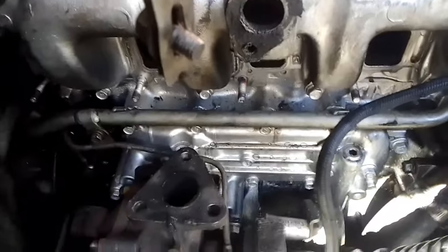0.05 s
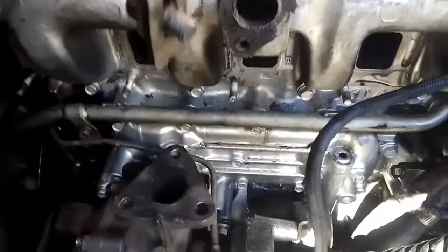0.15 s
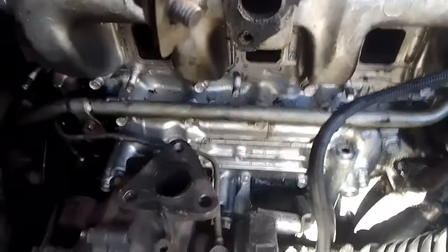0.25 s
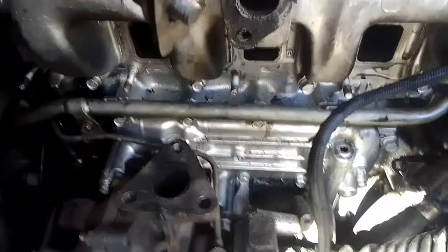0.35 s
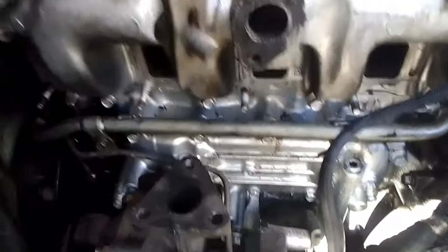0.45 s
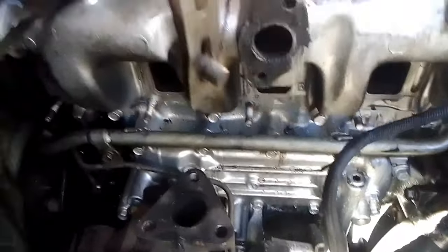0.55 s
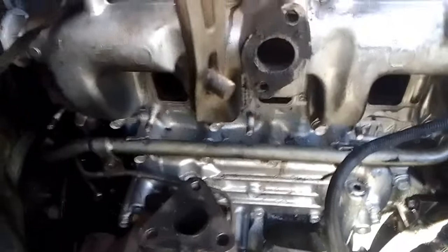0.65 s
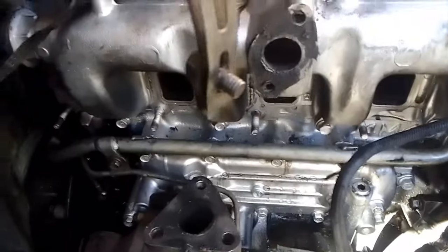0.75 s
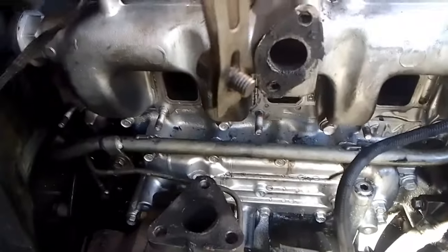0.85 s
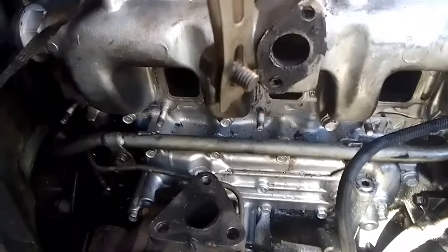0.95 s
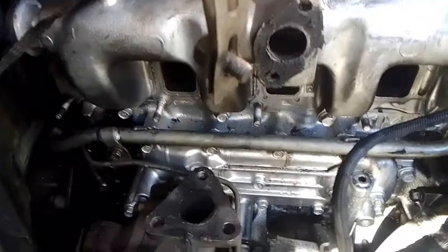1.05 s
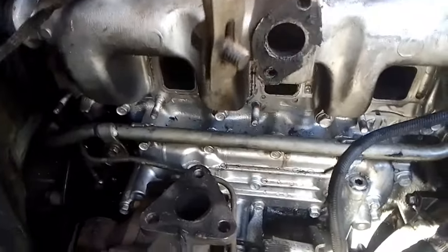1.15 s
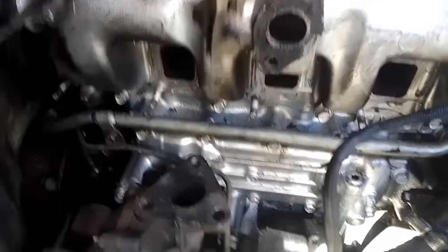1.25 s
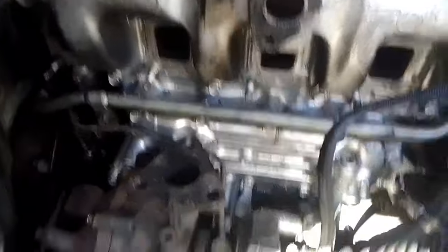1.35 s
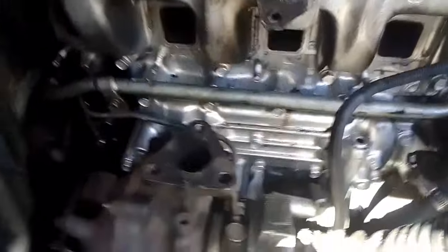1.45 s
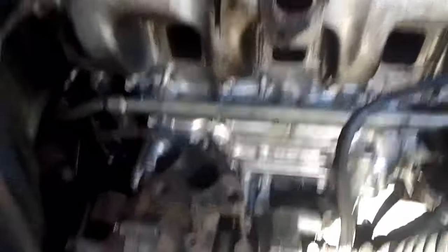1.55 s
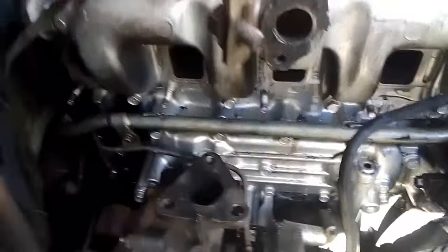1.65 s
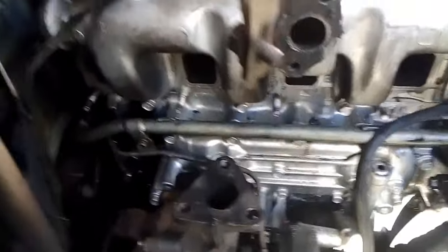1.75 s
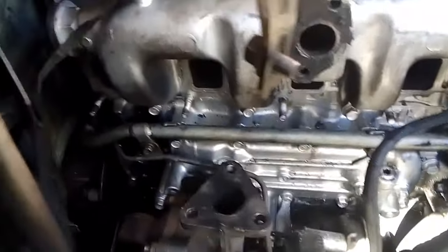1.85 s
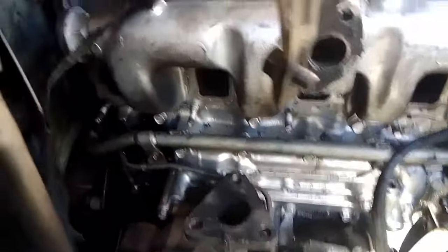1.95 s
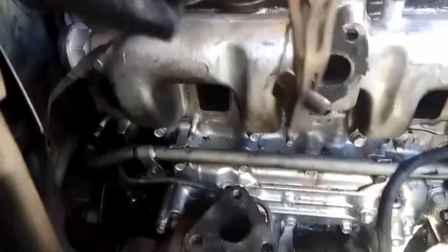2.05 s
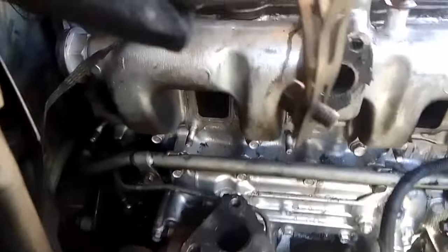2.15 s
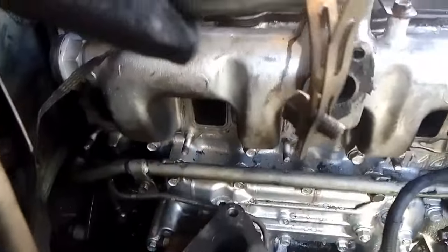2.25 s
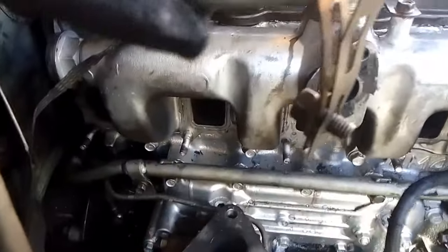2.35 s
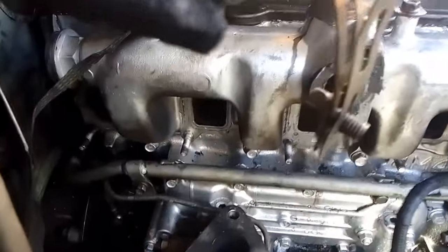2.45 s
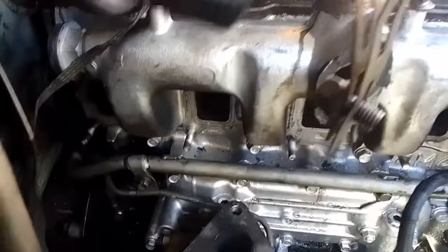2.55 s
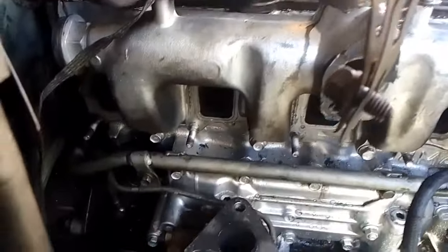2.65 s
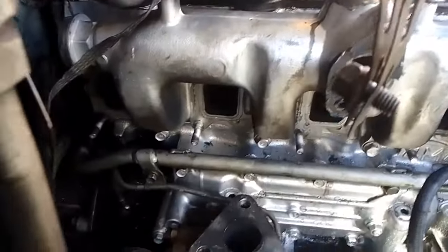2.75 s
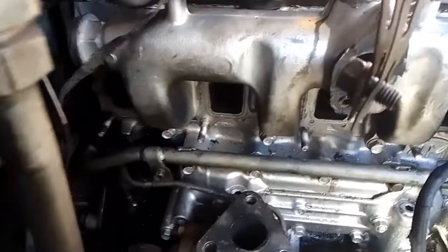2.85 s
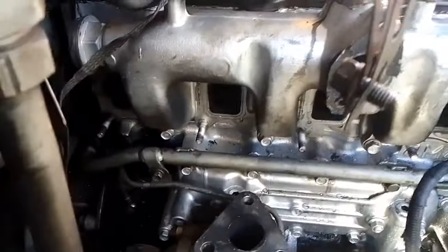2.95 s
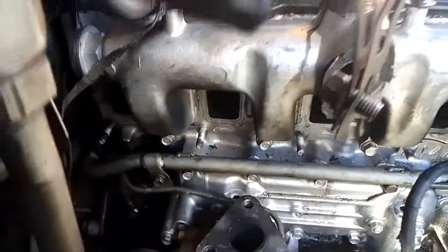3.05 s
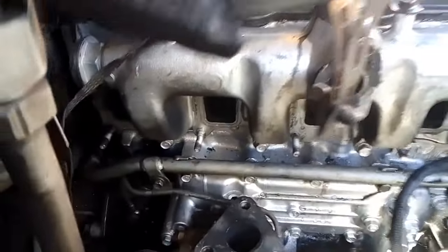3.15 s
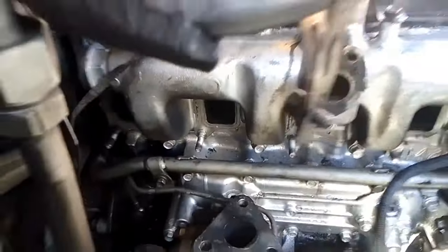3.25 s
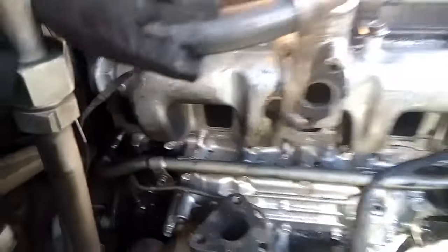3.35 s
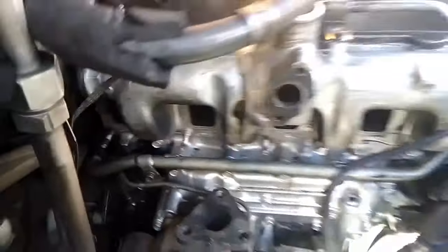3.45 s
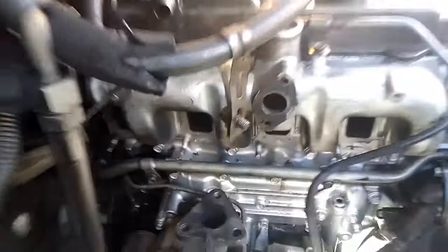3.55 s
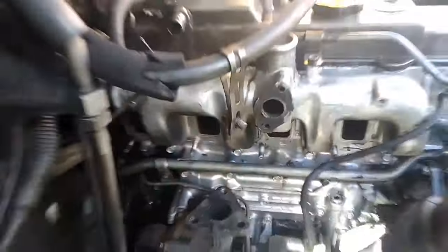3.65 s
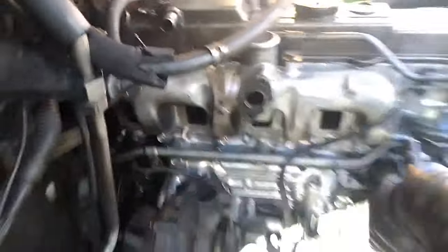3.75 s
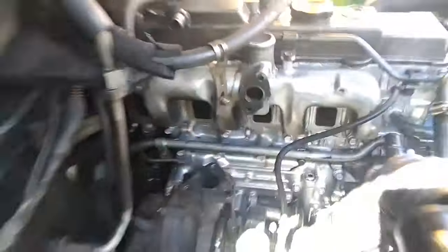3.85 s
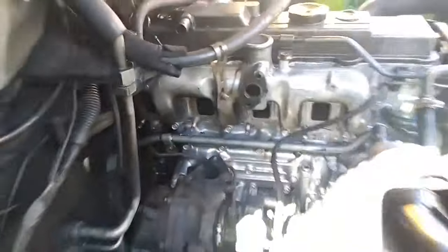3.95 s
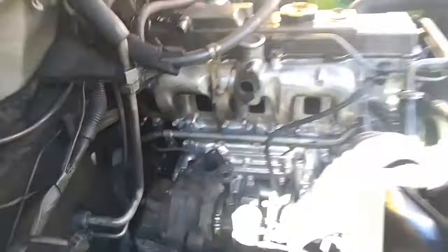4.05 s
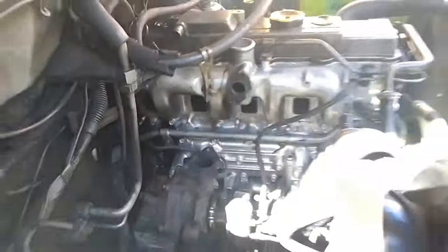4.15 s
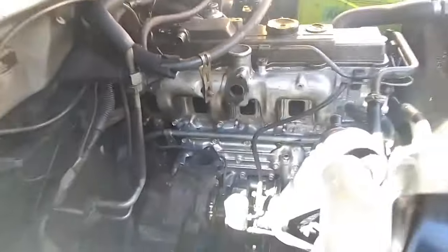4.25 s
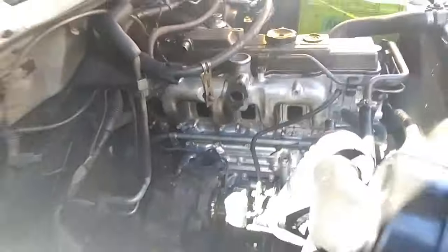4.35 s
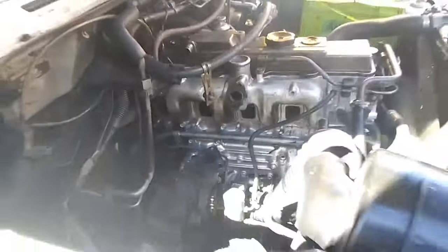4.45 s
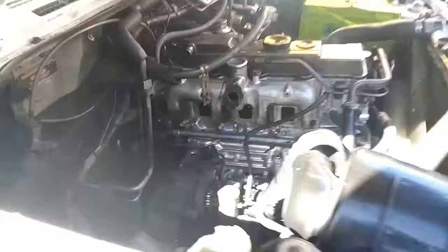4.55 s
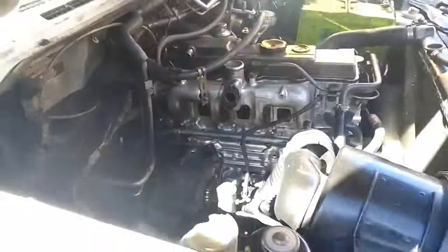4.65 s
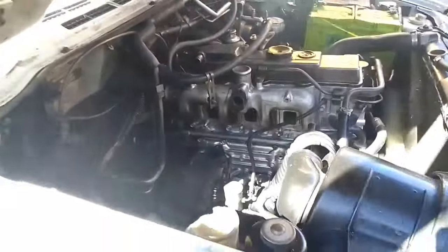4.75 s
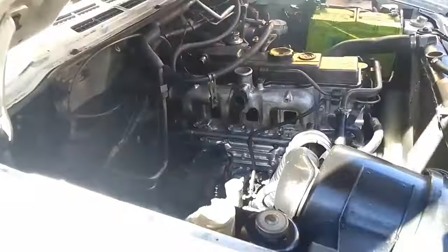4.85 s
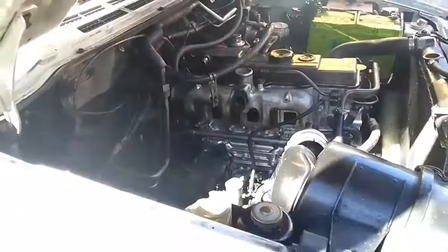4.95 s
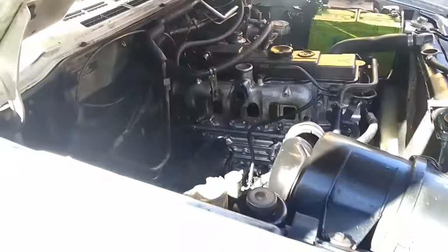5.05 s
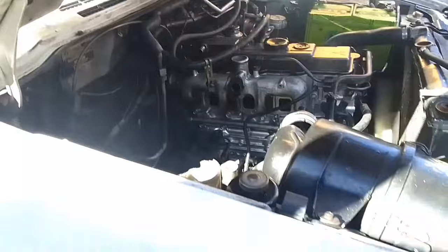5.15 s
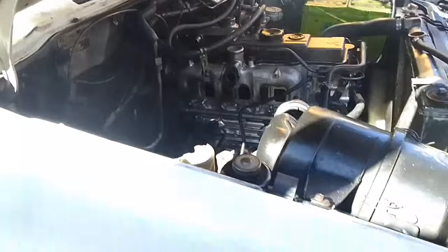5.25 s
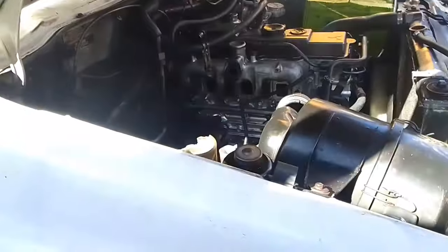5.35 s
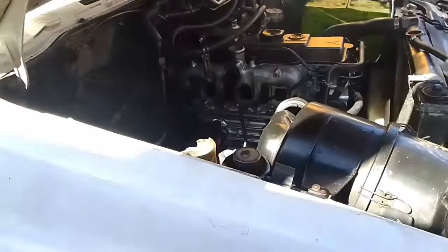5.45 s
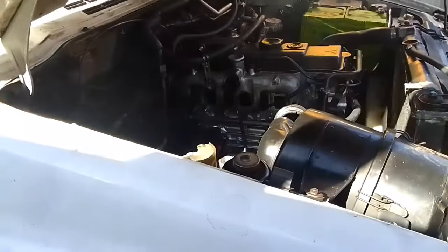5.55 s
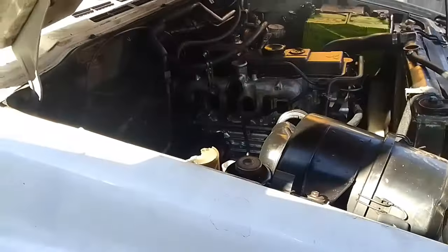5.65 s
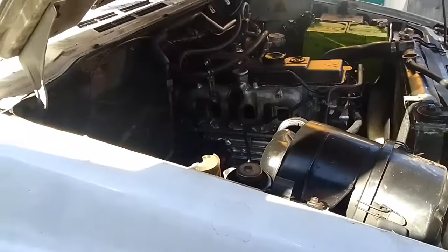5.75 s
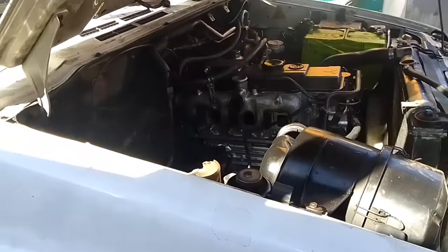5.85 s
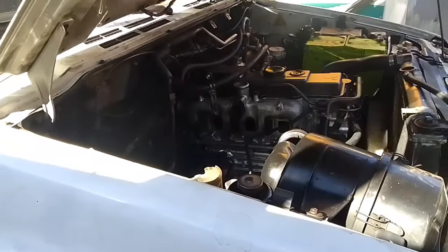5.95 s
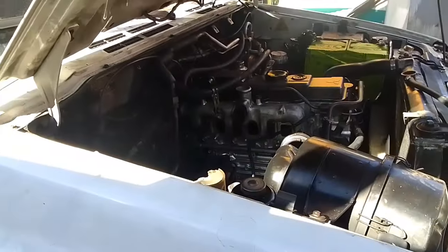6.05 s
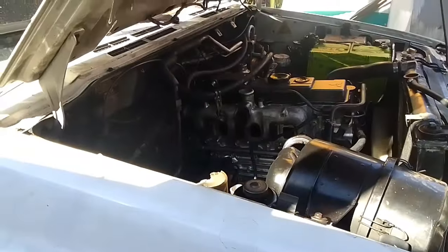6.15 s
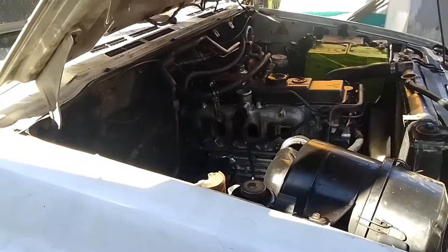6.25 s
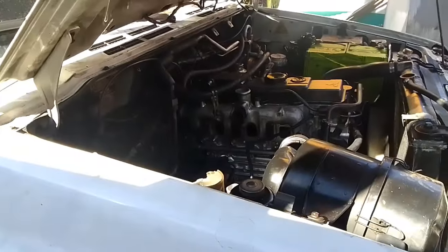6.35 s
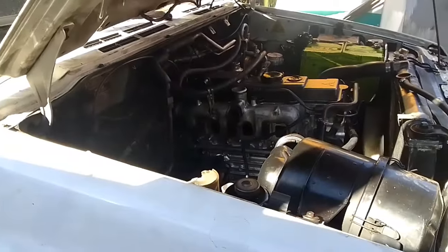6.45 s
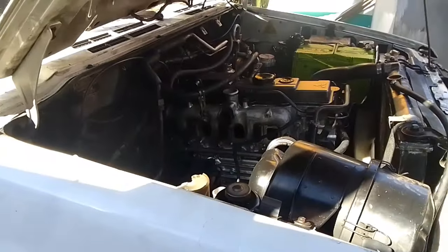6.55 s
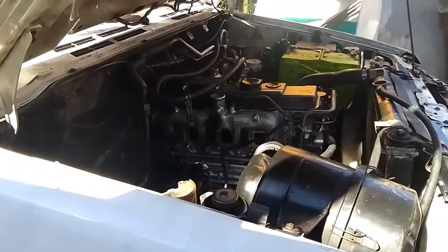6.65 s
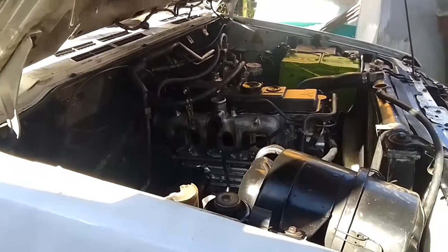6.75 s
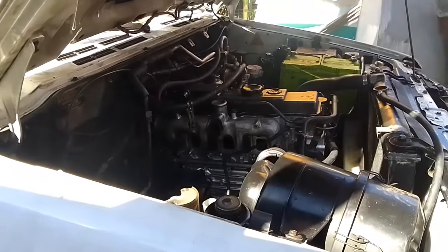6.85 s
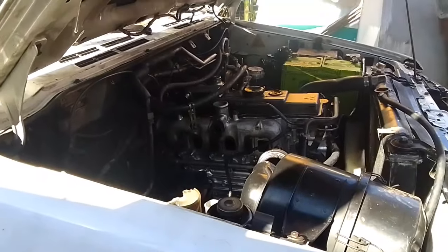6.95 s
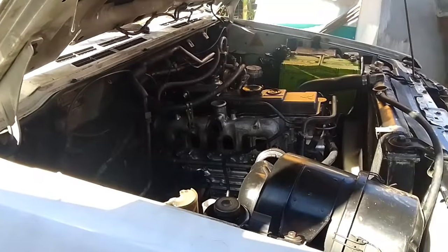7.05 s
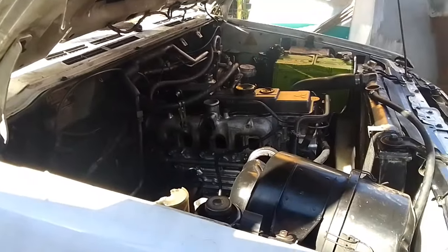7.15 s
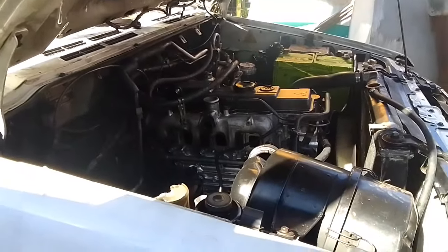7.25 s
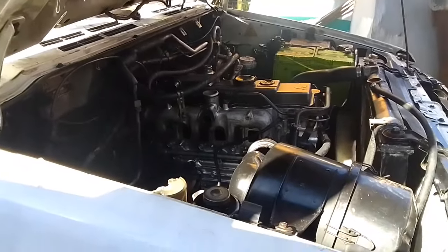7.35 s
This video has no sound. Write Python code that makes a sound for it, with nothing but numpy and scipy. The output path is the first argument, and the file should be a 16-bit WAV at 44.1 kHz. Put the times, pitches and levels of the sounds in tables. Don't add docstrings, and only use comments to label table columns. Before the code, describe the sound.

Close, overloaded diesel idle with deep uneven exhaust puffs, hard knocks and ticking valve gear, growing quieter and thinner as the microphone retreats.

```python
import sys
import numpy as np
from scipy import signal
from scipy.fft import rfft, irfft, next_fast_len
from scipy.io import wavfile
from scipy.ndimage import uniform_filter1d

SR = 44100
rng = np.random.default_rng(int(sys.argv[2]) if len(sys.argv) > 2 else 0)


def decibels_to_gain(level_db):
    exponent = np.asarray(level_db, float) / 20
    return 10 ** exponent


def store_wav(level_fs):
    pcm = np.round(np.clip(np.atleast_2d(level_fs), -1, 1) * 32767)
    wavfile.write(sys.argv[1], SR, pcm.T.astype(np.int16))


N = 326781
SECONDS = np.arange(N) / SR
FIRING_HZ = 35.84

# start_s, lead_firings
CRANK_LEAD = [(0.06, -0.441), (0.508, -0.466), (0.956, -0.554), (1.18, -0.546), (1.516, -0.567),
              (1.852, -0.561), (2.188, -0.512), (3.5, -0.417), (3.7, -0.428), (4.092, -0.489),
              (4.6, -0.501), (4.876, -0.547), (5.15, -0.545), (5.45, -0.501), (5.95, -0.594),
              (6.22, -0.592), (6.76, -0.624), (7.41, -0.548)]
# start_s, nearness_0_1
NEARNESS = [
    (0, 0.87),
    (3.3, 0.83),
    (4.1, 0.32),
    (5.1, 0.1),
    (7.41, 0.06),
]
# start_s, level_db
RETREAT = [(0, -0.5), (.7, -0.9), (1.5, -0.4), (2, -0.5), (2.6, -0.5), (3.35, -0.5), (3.7, -2), (4, -3),
           (4.6, -7), (5, -8.5), (5.4, -8.5), (5.8, -10), (7.41, -9.5)]
# start_s, share_0_1, delay_ms
WING_ECHO = [
    (0, 0, 0.9),
    (3.6, 0.05, 0.68),
    (4.1, 0.5, 0.69),
    (4.65, 0.45, 0.68),
    (5.0, 0.15, 0.8),
    (5.8, 0.25, 0.84),
    (7.41, 0.2, 0.8),
]

# pitch_hz, t60_s
PIPE_NEAR = [(146, 0.25), (174, 0.142), (195, 0.222), (214, 0.25), (276, 0.102)]
PIPE_FAR = [(145, 0.25), (177, 0.226), (209, 0.25), (194, 0.25), (261, 0.117)]
# place_firings, then level_db into each pipe mode
PUFFS_NEAR = [(0.813, -4.0, 6.3, -5.0, -1.2, -22.2), (1.847, -3.1, -7.2, 3.5, 0.7, -3.1),
              (2.798, -2.0, 10.8, 0.6, 0.7, -6.7), (3.862, -1.1, -30.5, -5.4, 4.6, -30.5)]
PUFFS_FAR = [(0.802, -4.6, 1.8, 7.4, -7.0, -4.6), (1.799, -3.3, -3.8, -8.9, -3.3, 2.3),
             (2.784, -6.6, 4.6, 5.2, 4.6, -30.5), (3.845, -4.1, -30.5, 1.9, -30.5, -30.5)]
# firing_order, place_firings, level_db
PIPE_OVERTONES = [(2, .32, -29), (9, 0.047, -20), (12, .005, -21.5)]
WING_OVERTONES = [(11, .029, 0), (14, .0136, 0), (15, .006, -2)]
MOUNT_ROCKING = [(3, 0.1, -2)]
PANEL_SWAY = [(1, 0.71, 0), (1.75, .314, -9), (2, 0.325, -8), (2.25, .44, -4), (2.5, 0.285, -9),
              (2.75, .156, -7), (3.25, .237, -5), (6.75, .005, -2), (7, 0.056, -3)]

# place_firings, near_db, far_db
KNOCKS = [(.3, 13.5, 11.5), (.85, -7, 18), (1.3, 9, 5), (1.65, 8.5, 18), (2.35, 9.5, 12.5), (2.7, 4, 10.5),
          (3.3, 9, 11), (3.65, -18, 10.5)]
# pitch_hz, width_hz, level_db
BLOCK_NEAR = [(481.7, 57, 1), (1310, 202, 3), (1620, 280, -12), (2560, 200, -13)]
BLOCK_FAR = [(524, 250, -4.5), (1095, 126, 6), (1515, 82, 13.5), (1824, 237, 5.5), (2598, 53, 2.5)]
# pitch_hz, level_db_per_hz
ROAR_NEAR = [(160, -26), (280, -1), (376, -9), (475, -6), (772, -3), (1010, -5), (1370, 1.5), (1800, -4),
             (3500, -24), (4550, -55), (7700, -120)]
ROAR_FAR = [(160, -13), (280, 5), (369, -2.5), (485, 3.5), (625, -1), (1200, 2), (1550, 3), (2220, -3),
            (3500, -71), (4550, -55), (7700, -120)]
WALLS_NEAR = [1240, 1310, 1378, 1480, 1620]
WALLS_FAR = [1420, 1514, 1544, 1620, 1763]
# start_s, peak_db, pitch_hz
HARD_KNOCKS = [(0.024, -1, 1390), (0.0514, -5, 1320), (0.0853, -1, 1310), (0.108, 1.5, 1294),
               (0.193, 0, 1285), (0.2183, 3, 1310), (0.333, 4, 1310), (0.357, 1, 1470), (0.4195, 0.5, 1260),
               (0.6656, 5.5, 1307), (0.812, -8, 1290), (0.889, 0.5, 1254), (1.0014, 3.5, 1310),
               (1.1143, -5, 1240), (1.3374, 0, 1240), (1.4492, 2.5, 1277), (1.504, 1.5, 1390),
               (1.5617, -2.5, 1400), (1.782, -1, 1310), (1.8934, 2.5, 1360), (1.92, -7, 1360),
               (2.1137, 0.5, 1210), (2.338, -2.5, 1320), (2.5602, 0.5, 1320), (2.672, 4.5, 1290),
               (2.784, -3, 1340), (2.9823, -3, 1290), (3.289, -5, 1370), (3.3433, 0.5, 1290),
               (3.596, -2.5, 1450)]
DISTANT_KNOCKS = [(3.6536, 0, 1670), (3.7353, -2, 1490), (3.764, -5, 1620), (3.875, -4, 1690),
                  (3.9876, -13, 1370), (4.1545, -3, 1570), (4.275, -5, 1310), (4.6143, -10, 1350),
                  (4.8645, -2, 1594), (5.0617, -10, 1535), (5.2, -6.5, 1480), (5.2713, -4, 1480),
                  (5.728, -9, 1530), (5.8432, -8, 1530), (6.0914, -15, 1500), (6.286, -7, 1130),
                  (6.4265, -7, 1530)]
# start_s, peak_db
SUMP_THUDS = [(0.193, -12), (0.288, -15.5), (0.615, -19), (0.756, -18), (0.867, -16), (0.962, -16),
              (1.188, -19), (1.52, -17), (2.206, -16), (2.874, -13), (3.204, -19), (5.053, -25),
              (6.029, -21.5)]

# place_firings, near_db, far_db
TICKS = [(.62, 8.5, 12), (1.1, -1, -27), (1.62, 10, 15.5), (2.05, 4, -4), (2.62, 3, 2.5), (3.35, 5.5, -12),
         (3.62, 4.5, 8)]
# pitch_hz, level_db_per_hz
GEAR_NEAR = [(1410, -21), (2400, -1), (2600, -3), (3070, -5), (3670, -8), (4820, -6.5), (5630, -11.5),
             (6170, -8), (7810, -8), (9500, -23.5), (12400, -70), (20900, -120)]
GEAR_FAR = [(1410, 2), (2400, -7), (2690, 0.5), (3700, -19), (4490, -8.5), (4900, -5), (5340, -5.5),
            (6800, -7), (8180, -6.5), (9500, -19), (12400, -56), (20900, -120)]
TAPPET_PARTS = [2650, 4790, 4790, 5120, 6210, 6980, 8280]
ROCKERS = [2375, 2560, 2604, 2790]
# start_s, peak_db, pitch_hz
ROCKER_CHIRPS = [(0.59, -23, 2550), (1.1772, -22, 2650), (1.8761, -13, 2610), (2.0991, -18, 2560),
                 (3.3795, -20, 2490), (3.4915, -27, 2400), (3.768, -17, 2550), (5.3053, -26, 2400),
                 (5.7264, -22, 2790), (6.286, -24, 2790)]
# start_s, peak_db
TAPPET_PINGS = [(3.2944, -17), (3.9384, -9), (4.4962, -15), (5.0838, -15), (5.6416, -22), (6.535, -16),
                (7.0933, -14), (7.3163, -16)]
# place_firings, near_db, far_db
SPITS = [(.58, 12, 22), (1.03, 14, 9), (1.57, 12, 25), (2.03, 2, 4), (2.55, 0, 12), (3.3, -2, -4),
         (3.6, 13, 18)]
# pitch_hz, level_db_per_hz
SPIT_SPECTRUM = [(8000, -25), (9300, -37), (10000, 0.5), (11300, 1.5), (12500, 8), (15000, 9), (15800, 7)]

# pitch_hz, width_hz, level_db
COVER = [(1551, 16, 0)]
# pitch_hz, level_db_per_hz
FLOW_RUMBLE = [(15, -60), (30, -45), (55, -38), (90, -18.5), (200, -8), (260, -6), (330, -34), (600, -120)]
FAN_BUFFET = [(10, -6), (25, 0), (45, -8), (70, -8), (110, -30), (300, -120)]


def exhaust_note(level_db):
    near = nearness()
    size_db = 0.8 * rng.standard_normal((4, 70))
    close = pipe_ring(PUFFS_NEAR, PIPE_NEAR, 0.0051, size_db)
    afar = pipe_ring(PUFFS_FAR, PIPE_FAR, 0.0037, size_db)
    overtones = decibels_to_gain(-3.5 - 3.9 * near) * orders(PIPE_OVERTONES)
    mirrored = decibels_to_gain(-9) * curves(WING_ECHO)[0] ** 2 * orders(WING_OVERTONES)
    return decibels_to_gain(level_db + 0.28) * (near * close + (1 - near) * afar + overtones + mirrored)


def pipe_ring(puffs, pipe, rise_s, size_db):
    t = SECONDS[:SR // 3]
    drive = np.zeros((len(pipe), N))
    for (place, *mode_db), luck_db in zip(puffs, size_db):
        at = moments(place, jitter_s=0)
        drive[:, at] = decibels_to_gain(np.array(mode_db)[:, None] + luck_db[:len(at)])
    swell = 1 - np.exp(-t / rise_s)
    modes = [np.sin(2 * np.pi * hz * t) * decibels_to_gain(-60 * t / t60) * swell for hz, t60 in pipe]
    note = signal.fftconvolve(drive, modes, axes=1)[:, :N].sum(0)
    return unit(filtered(note, bass_cut(60)))


def block_noise(level_db):
    bursts_in = bursts(KNOCKS, scatter_db=4, rise_s=0.0045, t60_s=0.062, rest_db=-29, jitter_s=0.00029)
    knock = by_distance(bursts_in, body(BLOCK_NEAR), body(BLOCK_FAR))
    roar = by_distance(rng.standard_normal(N), shape(ROAR_NEAR), shape(ROAR_FAR))
    noise = filtered(decibels_to_gain(-5.5) * (knock + roar), bass_cut(190))
    return decibels_to_gain(level_db) * wing_echo(noise)


def wing_echo(x):
    share, delay_ms = curves(WING_ECHO)
    dull = filtered(x, lambda hz: 1 / (1 + (hz / 1190) ** 4))
    echo = np.interp(SECONDS - delay_ms / 1000, SECONDS, dull)
    return (x + share * echo) / np.sqrt(1 + share ** 2)


def block_walls(level_db):
    walls = clinks(KNOCKS, WALLS_NEAR, WALLS_FAR, spread=0.03, swell_s=0.0026, scatter_db=1.8)
    liners = clinks(KNOCKS, WALLS_NEAR, WALLS_FAR, spread=0.025, swell_s=0.0036, scatter_db=0.5)
    return decibels_to_gain(level_db - 10) * walls + decibels_to_gain(level_db - 7.5) * liners


def hard_blows():
    close = rings([(*row, 0.0027) for row in HARD_KNOCKS], trim_db=-5.5)
    distant = rings([(*row, 0.0027) for row in DISTANT_KNOCKS], trim_db=-9)
    thuds = strikes(SUMP_THUDS, pitch_hz=488, swell_s=0.0055, trim_db=0.5)
    return close + distant + thuds


def mount_shake(loss_db):
    rocking = decibels_to_gain(-20 + 2.05 * loss_db) * orders(MOUNT_ROCKING)
    sway = decibels_to_gain(-31.5 + 1.3 * loss_db) * orders(PANEL_SWAY)
    return rocking + sway


def valve_gear(level_db):
    noise = bursts(TICKS, scatter_db=3, rise_s=0.0018, t60_s=0.039, rest_db=-1, jitter_s=0.0012)
    ticks = by_distance(noise, shape(GEAR_NEAR), shape(GEAR_FAR))
    parts = np.zeros(N)
    for _ in range(3):
        parts += clinks(TICKS, TAPPET_PARTS, TAPPET_PARTS, spread=0.03, swell_s=0.0023, scatter_db=9)
    rockers = clinks(KNOCKS, ROCKERS, ROCKERS, spread=0.021, swell_s=0.0046, scatter_db=12)
    chirps = rings([(*row, 0.0035) for row in ROCKER_CHIRPS], trim_db=-4.5)
    pings = strikes(TAPPET_PINGS, pitch_hz=4840, swell_s=0.0013, trim_db=-11)
    steady = decibels_to_gain(level_db + 0.93) * ticks + decibels_to_gain(level_db - 14.5) * parts + decibels_to_gain(level_db - 20) * rockers
    return steady + chirps + pings


def injector_spits(level_db):
    spits = bursts(SPITS, scatter_db=1.6, rise_s=0.0015, t60_s=0.04, rest_db=-5, jitter_s=0.0005)
    return decibels_to_gain(level_db - 10.5) * unit(filtered(spits, shape(SPIT_SPECTRUM)))


def singing_cover(level_db):
    tone = unit(filtered(rng.standard_normal(N), body(COVER)))
    return decibels_to_gain(level_db - 9) * (1 - nearness()) ** 4 * tone


def moving_air(level_db):
    rumble = unit(filtered(rng.standard_normal(N), shape(FLOW_RUMBLE)))
    buffet = nearness() ** 3 * unit(filtered(rng.standard_normal(N), shape(FAN_BUFFET)))
    return decibels_to_gain(level_db - 13.5) * rumble + decibels_to_gain(level_db - 19) * buffet


def bursts(table, scatter_db, rise_s, t60_s, rest_db, jitter_s):
    near, t = nearness(), SECONDS[:SR // 8]
    kicks = np.zeros(N)
    for place, near_db, far_db in table:
        at = moments(place, jitter_s)
        luck = rng.standard_normal(len(at)).clip(-1.4, 1.4)
        kicks[at] = decibels_to_gain(far_db + (near_db - far_db) * near[at] + scatter_db * luck)
    decay = decibels_to_gain(-60 * t / t60_s) * (1 - np.exp(-t / rise_s))
    envelope = signal.fftconvolve(kicks, decay)[:N] + decibels_to_gain(rest_db)
    return envelope / np.sqrt(uniform_filter1d(envelope ** 2, SR // 3)) * rng.standard_normal(N)


def clinks(table, near_hz, far_hz, spread, swell_s, scatter_db):
    near, rows = nearness(), []
    for place, near_db, far_db in table:
        at = moments(place, jitter_s=0.0009)
        part = rng.integers(len(near_hz), size=len(at))
        heard_near = rng.random(len(at)) < near[at]
        pitch_luck, level_luck = rng.standard_normal((2, len(at)))
        hz = np.where(heard_near, np.take(near_hz, part), np.take(far_hz, part))
        hz = hz * np.exp(spread * pitch_luck)
        db = far_db + (near_db - far_db) * near[at] + scatter_db * 2 * np.tanh(level_luck / 2)
        rows += zip(at / SR, db, hz, np.full(len(at), swell_s))
    out = rings(rows, trim_db=0)
    return out / np.sqrt(uniform_filter1d(out ** 2, SR // 2))


def rings(rows, trim_db):
    out = np.zeros(N + SR)
    for s, db, hz, swell_s in rows:
        t = SECONDS[:int(10 * swell_s * SR)]
        swell = t / swell_s * np.exp(1 - t / swell_s)
        out[round(s * SR):][:len(t)] += decibels_to_gain(db + trim_db) * swell * np.sin(2 * np.pi * hz * t)
    return out[:N]


def strikes(rows, pitch_hz, swell_s, trim_db):
    return rings([(s, db, pitch_hz, swell_s) for s, db in rows], trim_db)


def orders(table):
    turn = firings()
    return sum(np.sqrt(2) * decibels_to_gain(db) * np.sin(2 * np.pi * k * (turn - place)) for k, place, db in table)


def firings():
    return FIRING_HZ * SECONDS + curves(CRANK_LEAD)[0]


def moments(place, jitter_s):
    count = np.arange(-1, 69) * 4 + place
    s = np.interp(count, firings(), SECONDS, left=-1, right=-1)
    s = s + jitter_s * rng.standard_normal(len(count))
    return (s[s > 0] * SR).astype(int).clip(0, N - 1)


def by_distance(x, near_response, far_response):
    near = nearness()
    close, afar = unit(filtered(x, near_response)), unit(filtered(x, far_response))
    return np.sqrt(near) * close + np.sqrt(1 - near) * afar


def nearness():
    return np.clip(curves(NEARNESS)[0], 0, 1)


def curves(rows):
    s, *cols = np.transpose(rows)
    return [np.interp(SECONDS, s, c) for c in cols]


def unit(x):
    return x / np.sqrt(np.mean(x ** 2) + 1e-20)


def filtered(x, response):
    m = next_fast_len(N + SR // 2)
    return irfft(rfft(x, m) * response(np.fft.rfftfreq(m, 1 / SR)), m)[:N]


def bass_cut(corner_hz):
    return lambda hz: hz ** 4 / (hz ** 4 + float(corner_hz) ** 4)


def shape(points):
    f, db = np.transpose(points)
    return lambda hz: decibels_to_gain(np.interp(np.log(hz + 1), np.log(f + 1), db))


def body(modes):
    def response(f):
        total = 0
        for k, (centre, width, db) in enumerate(modes):
            total = total + (-1) ** k * decibels_to_gain(db) * 1j * f * width / (centre ** 2 - f * f + 1j * f * width)
        return total
    return response


def scene():
    loss_db, = curves(RETREAT)
    pipe_db = -10 + 1.05 * loss_db
    block_db = -15 + 0.82 * loss_db
    gear_db = -30.5 + 0.57 * loss_db
    engine = exhaust_note(pipe_db) + block_noise(block_db) + block_walls(block_db) + hard_blows()
    rattle = mount_shake(loss_db) + valve_gear(gear_db) + injector_spits(gear_db)
    background = singing_cover(block_db) + moving_air(pipe_db)
    return (engine + rattle + background)[None]


def low_pass(x):
    return signal.sosfilt(signal.butter(12, 16750, fs=SR, output="sos"), x)


def record(dry):
    held = dry / (1 + np.abs(dry / 0.74) ** 5) ** (1 / 5)
    mix = filtered(held[0], lambda hz: hz < 15830)[None]
    return low_pass(mix)


dry = scene()
out = record(dry)
store_wav(out)
```